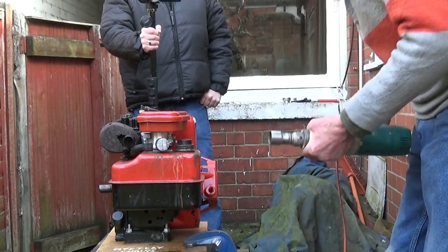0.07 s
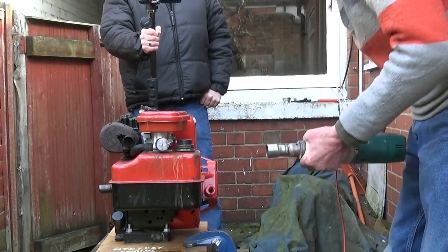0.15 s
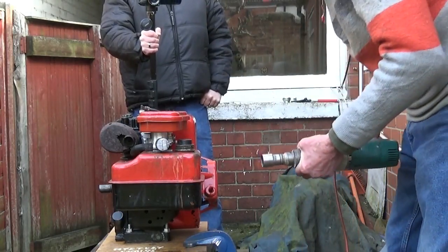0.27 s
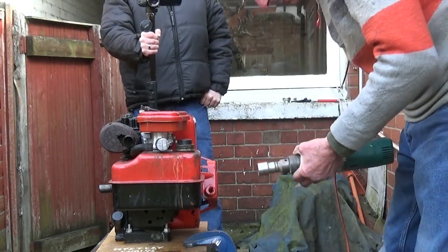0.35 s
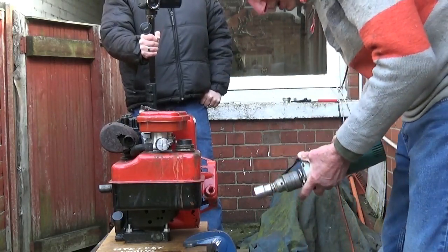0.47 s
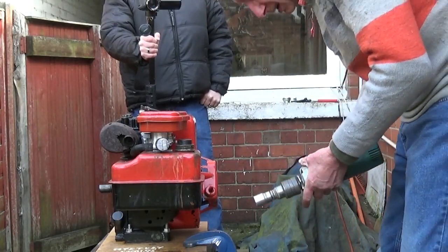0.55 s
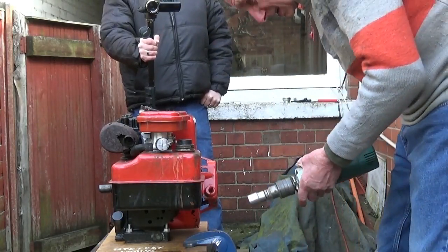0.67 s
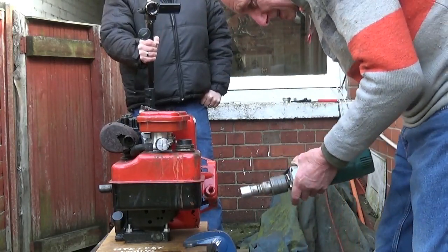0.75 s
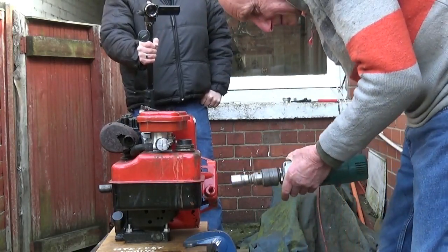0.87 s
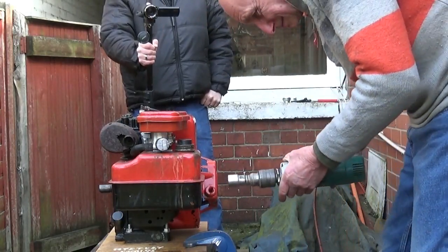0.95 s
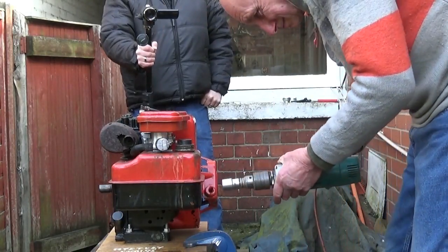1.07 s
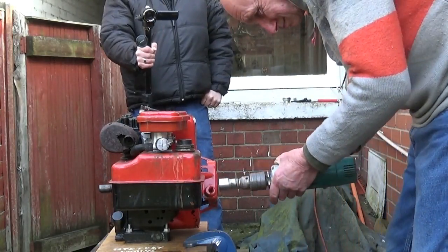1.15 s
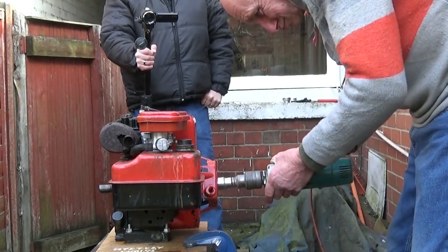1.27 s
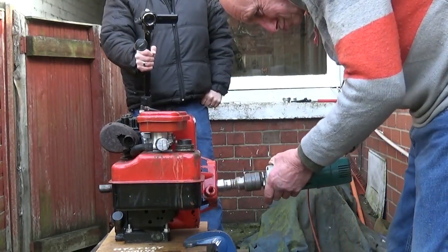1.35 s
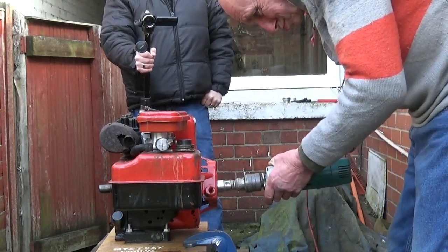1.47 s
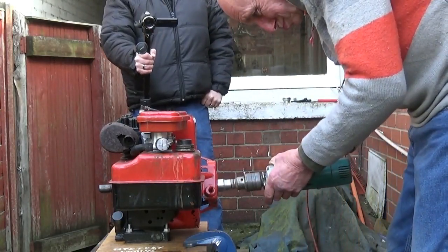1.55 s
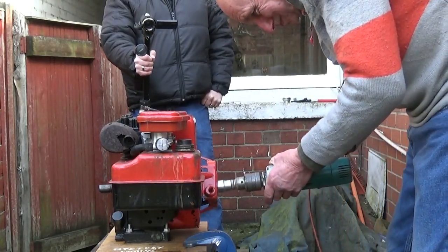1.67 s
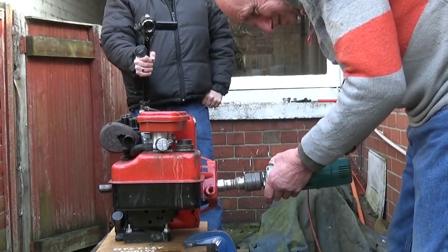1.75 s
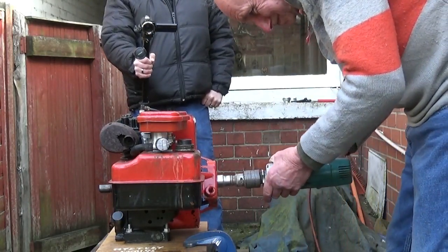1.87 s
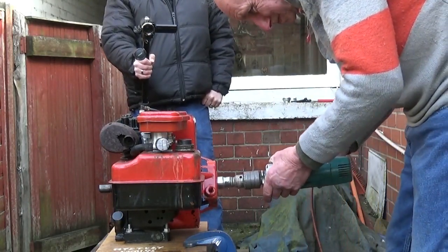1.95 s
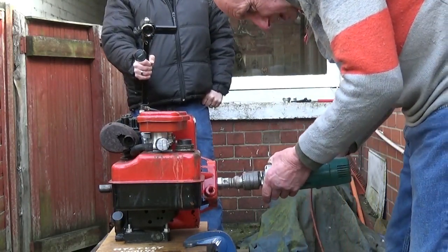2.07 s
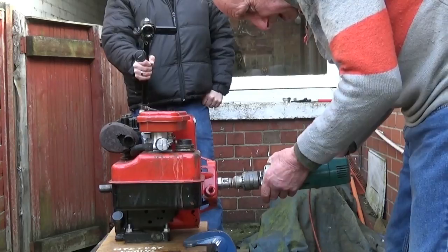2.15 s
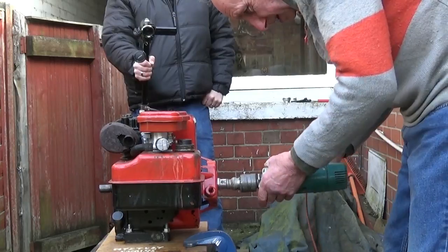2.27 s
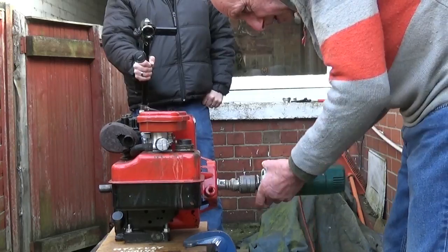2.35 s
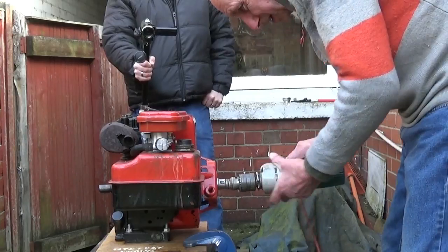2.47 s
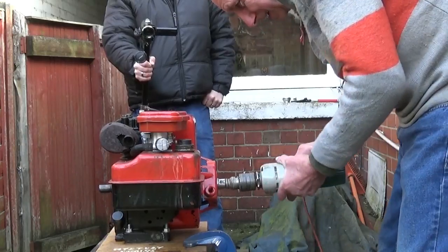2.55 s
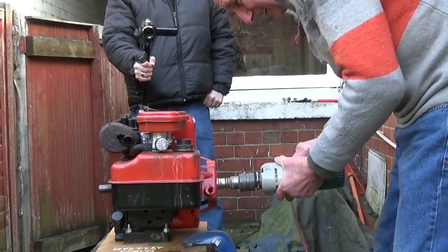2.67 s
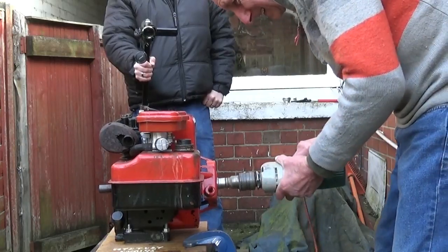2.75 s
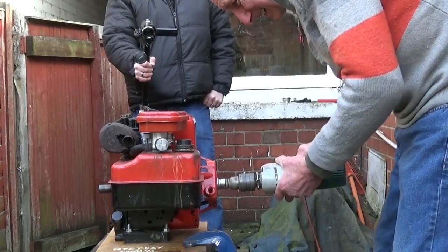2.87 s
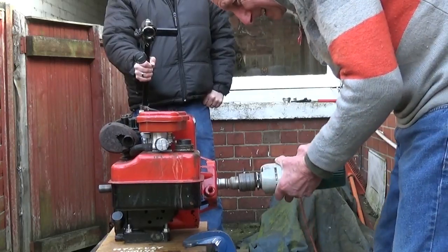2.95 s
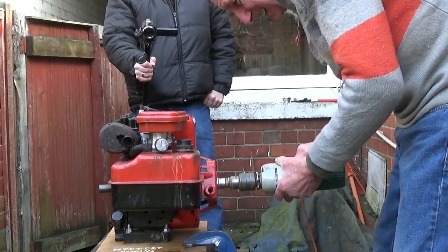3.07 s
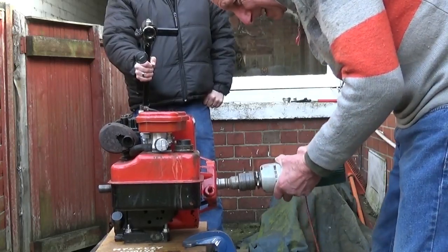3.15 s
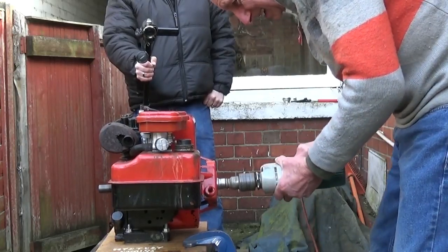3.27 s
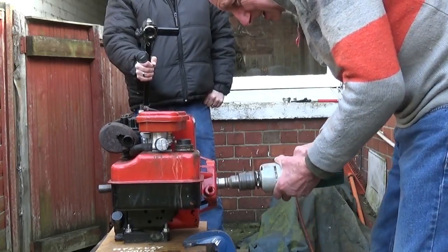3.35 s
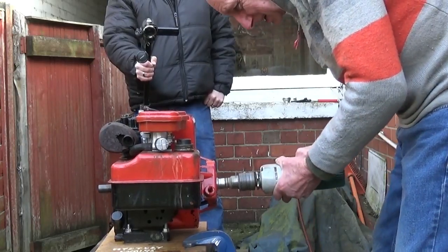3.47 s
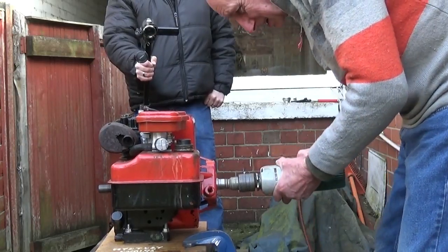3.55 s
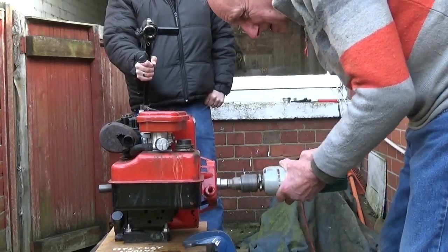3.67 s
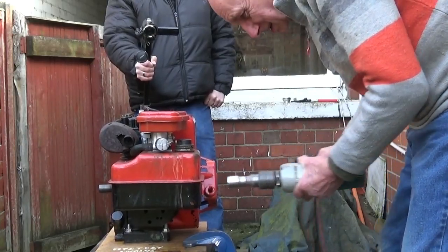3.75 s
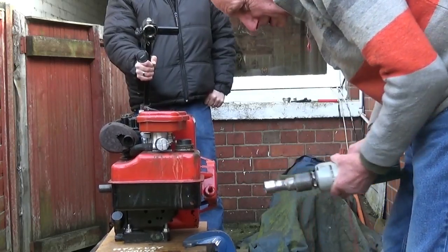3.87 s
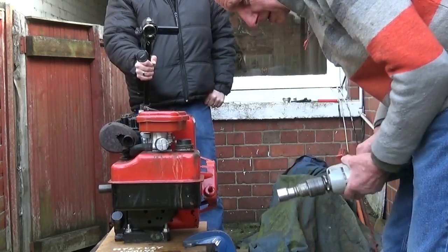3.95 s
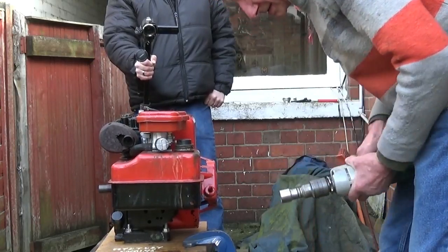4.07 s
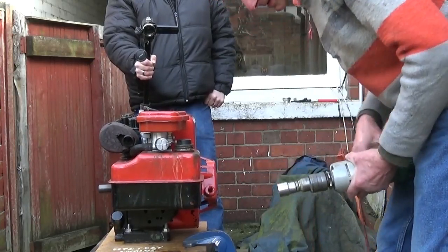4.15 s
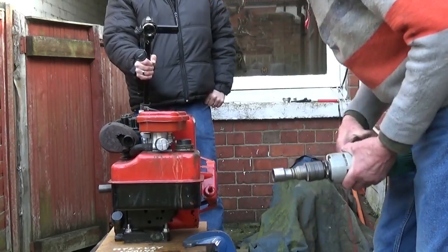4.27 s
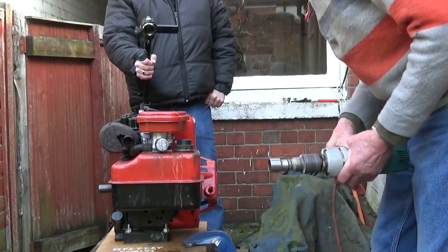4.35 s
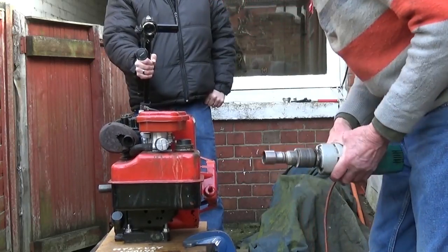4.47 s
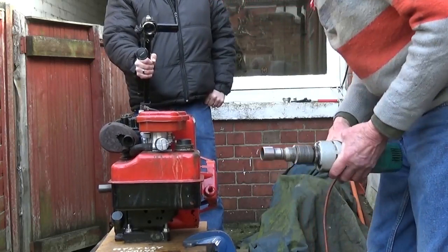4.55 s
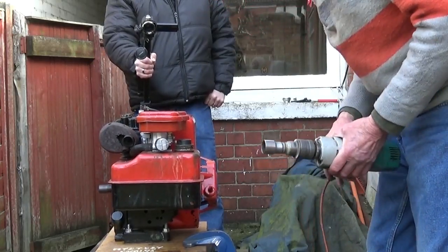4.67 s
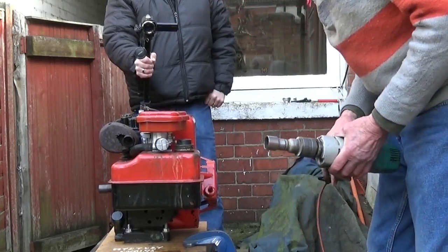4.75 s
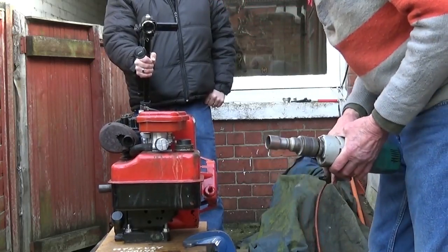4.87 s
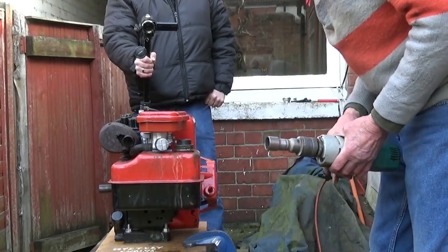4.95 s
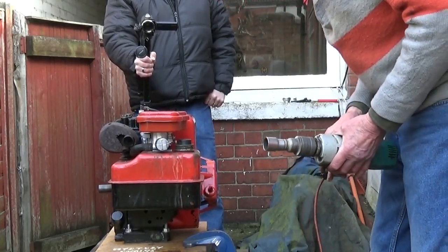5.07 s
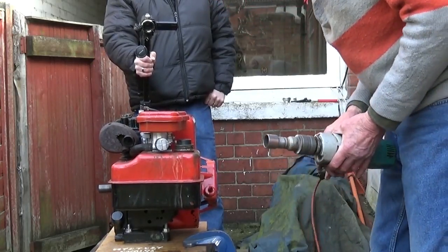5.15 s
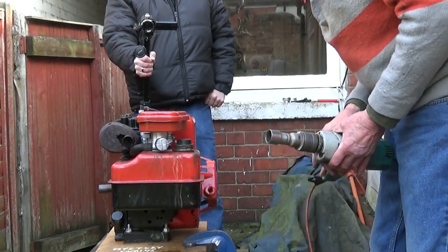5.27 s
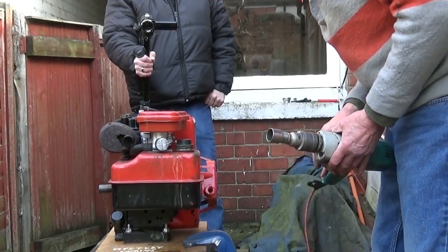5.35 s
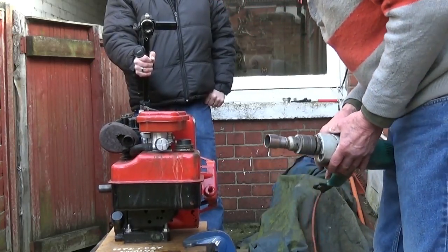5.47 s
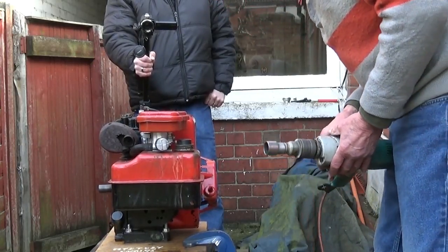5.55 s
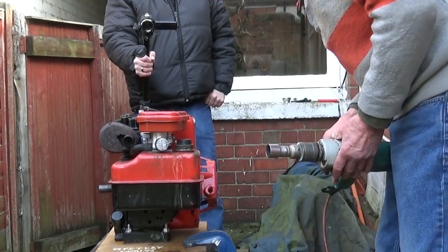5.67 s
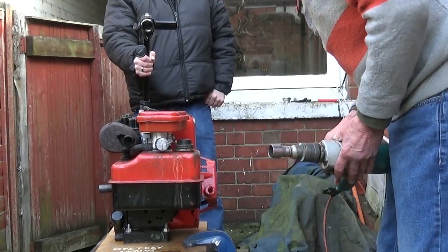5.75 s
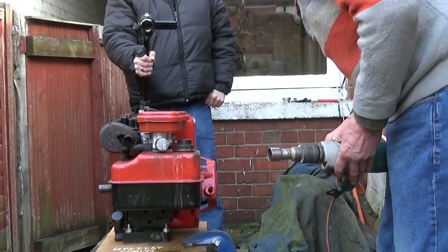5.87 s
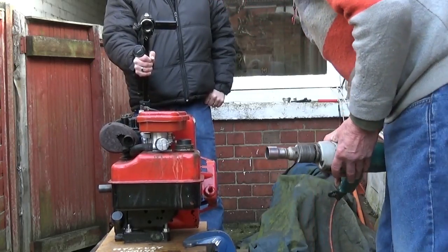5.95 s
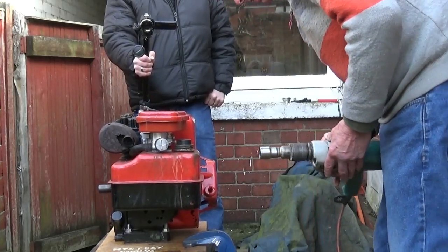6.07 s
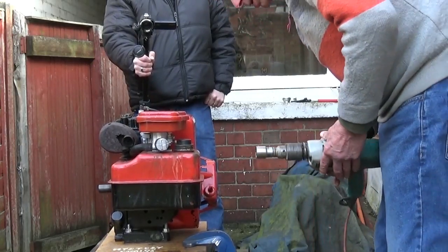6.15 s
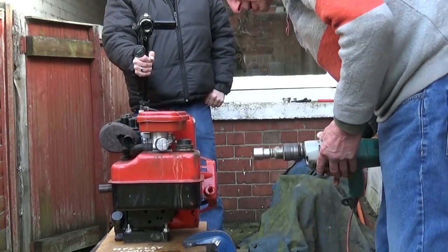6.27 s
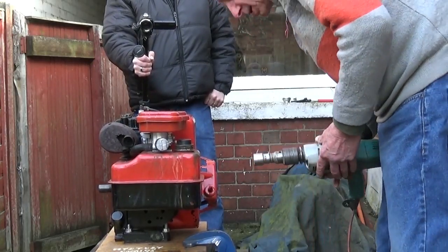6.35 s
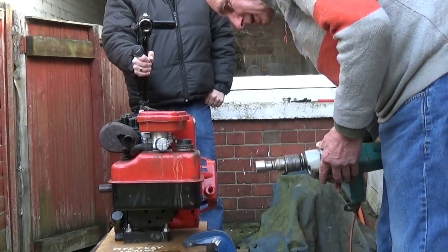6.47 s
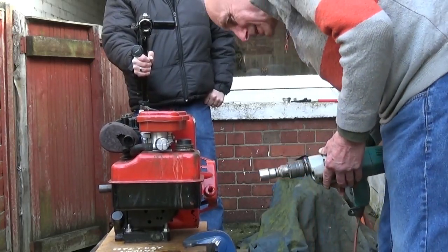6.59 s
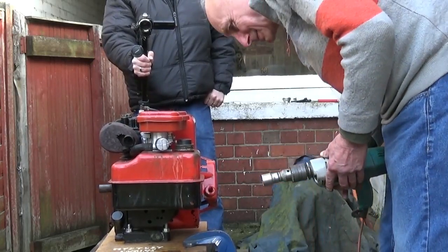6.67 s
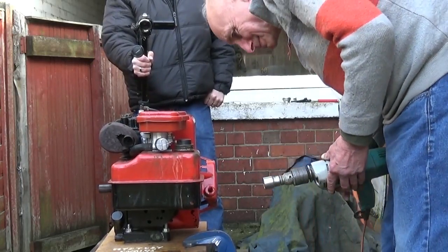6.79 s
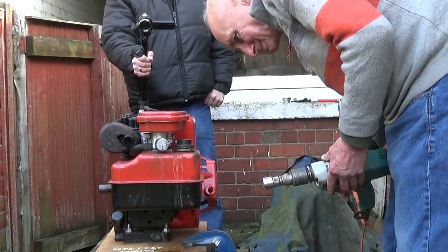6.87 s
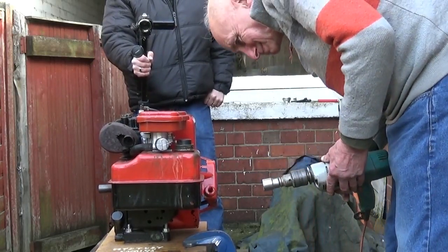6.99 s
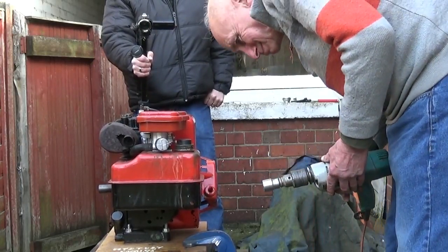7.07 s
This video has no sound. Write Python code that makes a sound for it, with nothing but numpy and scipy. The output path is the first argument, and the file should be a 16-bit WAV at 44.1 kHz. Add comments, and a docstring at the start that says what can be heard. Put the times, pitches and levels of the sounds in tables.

```python
"""Starting a small engine with an electric drill

A drill is blipped and coasts down while its socket is fumbled onto the shaft of a small single-cylinder engine.
The drill spins the engine up and is pulled off; the engine beats on, mostly slower and slower, and stops.
Each engine cycle has a valve clack, a knock and an exhaust puff. A brick yard answers.
Tones are sums of sines; rattles and hisses are dense random impacts given the colour of the part they strike.
"""
import sys
import numpy as np
from scipy import signal
from scipy.fft import rfft, irfft, next_fast_len
from scipy.io import wavfile
from scipy.ndimage import uniform_filter1d, map_coordinates

SR = 44100
rng = np.random.default_rng(int(sys.argv[2]) if len(sys.argv) > 2 else 0)


def int16_out(signal):
    """Quantize to a 16-bit WAV file."""
    q = np.round(np.clip(np.atleast_2d(signal).T, -1, 1) * 32767)
    wavfile.write(sys.argv[1], SR, q.astype(np.int16))


N = 313992  # length in samples

# colour of the drill's gear chatter: pitch_hz, relative level_db (per Hz)
GEAR_TONE = [(150, -51), (250, -17), (305, -22), (353, -31), (437, -16), (609, -35), (669, -12.5),
             (764, -13.5), (1020, -4), (1180, -4), (2400, 2), (3050, -3.5), (6000, -18), (7800, -33),
             (13200, -120)]
# colour of the drill's brush hiss: pitch_hz, relative level_db (per Hz)
BRUSH_TONE = [(1500, -19), (3500, -2), (5000, -1.5), (7000, 0), (9700, 0.5), (11000, -8.5), (13000, -17.5),
              (15800, -30)]
# resonances of the engine's metal: centre_hz, width_hz, boost_db over the rest
METAL_RESONANCES = [(429, 48, 6.5), (601, 77, 3.5), (828, 83, 2.5), (993, 45, 6), (1350, 127, 4),
                    (2050, 51, 1.5), (2528, 59, 4.5), (3970, 49, 3), (4620, 140, 4.5), (6040, 110, 4),
                    (9680, 730, 2.5)]
# colour of the crankcase: pitch_hz, relative level_db (per Hz)
CRANKCASE_COLOUR = [(330, -11.5), (560, -1.5), (900, 0), (1300, -4), (2500, -42)]
# resonances of the crankcase: centre_hz, width_hz, boost_db over the rest
CRANKCASE_RESONANCES = [(621, 48, 13.5), (820, 67, 11.5)]
# colour of the valve noises: pitch_hz, relative level_db (per Hz)
VALVE_COLOUR = [(120, -53), (200, -19), (596, -4), (728, -14), (1110, -1), (1280, -2.5), (1560, -7.5),
                (1780, 2), (2060, -7), (2560, -2), (5110, -5.5), (8660, -3), (15500, -22.5)]
# colour of the piston's knock: pitch_hz, relative level_db (per Hz)
KNOCK_COLOUR = [(120, -43), (200, -2.5), (479, -4), (1190, -4), (1880, 1.5), (2170, -2), (3070, 0.5),
                (3360, -5), (4410, -5), (7620, -7), (8980, -6.5), (14400, -27), (15500, -46)]
# how fast the engine turns: time_s, speed (four-stroke cycles a second)
ENGINE_CYCLES = [(2.65, 0.0), (2.8, 4.945), (3.15, 7.65), (3.55, 9.859), (4.2, 7.805), (5.1, 6.765),
                 (5.5, 6.026), (5.85, 6.307), (6.05, 5.631), (6.75, 4.828), (6.98, 2.236), (7.0, 0.0)]

TEETH = 6  # on the drill's pinion, so the gear mesh is six times the rotor speed
FIRST_STROKE_S, SOCKET_OFF_S = 2.85, 3.6  # compression builds; the drill lets go
SLOW_RATE = 5.92  # cycles a second of a slow beat
CLACK_PLACE, EXHAUST_PLACE = .394, .86  # where in the cycle these happen, 0-1


def amp(db):
    """Turn decibels into gain."""
    return 10 ** (np.asarray(db) / 20)


def unit(x):
    """Scale to an average (rms) strength of 1."""
    return x / np.sqrt(np.mean(x ** 2) + 1e-20)


def along(points, hz):
    """Read a curve of (Hz, value) points on a log pitch axis."""
    point_hz, values = np.transpose(points)
    return np.interp(np.log(hz + 1), np.log(point_hz + 1), values)


def curves(rows):
    """Turn each column after the time into one value per sample."""
    times, *columns = np.transpose(rows)
    return [np.interp(np.arange(N) / SR, times, column) for column in columns]


def wobble(rate):
    """Draw a smooth random curve through rate random points a second."""
    knots = rng.standard_normal(int(N * rate / SR) + 4)
    return map_coordinates(knots, [np.arange(N) * rate / SR])


def filtered(x, response):
    """Change the gain of every pitch in x by a response, a function of Hz."""
    length = x.shape[-1]
    padded = next_fast_len(length + 8192)
    spectrum = rfft(x, padded) * response(np.fft.rfftfreq(padded, 1 / SR))
    return irfft(spectrum, padded)[..., :length]


def shape(points, resonances, hz):
    """Gain of a broad spectrum with resonances on top."""
    peaks_db = sum(db / (1 + (2 * (hz - centre) / width) ** 2) for centre, width, db in resonances)
    return amp(along(points, hz) + peaks_db)


def causal(points, resonances, size=16384):
    """Impulse response of energy 1 with the given spectrum, sounding only after its start."""
    cepstrum = irfft(np.log(shape(points, resonances, np.fft.rfftfreq(size, 1 / SR))))
    # folding the second half onto the first gives minimum phase
    cepstrum[1:size // 2] *= 2
    cepstrum[size // 2 + 1:] = 0
    response = irfft(np.exp(rfft(cepstrum)))
    return response / np.linalg.norm(response)


def rattle(tone, rate, resonances=(), patchy_db=0):
    """Dense tiny impacts, rate a second, in a body whose modes they strike with ever new strengths; rms 1."""
    impacts = rng.standard_normal(N) * (rng.random(N) < rate / SR)
    z = signal.stft(impacts, nperseg=512)[2]
    # smooth over neighbouring pitches, then over time
    patches = uniform_filter1d(rng.standard_normal(z.shape), size=3, axis=0)
    patches = uniform_filter1d(patches, size=6, axis=1)
    impacts = signal.istft(z * amp(patchy_db * unit(patches)), nperseg=512)[1][:N]
    return unit(filtered(impacts, lambda hz: shape(tone, resonances, hz)))


def bursts(times, levels, attack, hold, t60):
    """Envelope of blows that rise, chatter on for a while and die 60 dB in t60; all in seconds."""
    t, out = np.arange(SR // 2) / SR, np.zeros(N + SR)
    blow = (1 - np.exp(-t / attack)) * amp(-60 * np.maximum(t - hold, 0) / t60)
    for s, db in zip(times, levels):
        out[round(s * SR):][:len(t)] += amp(db) * blow
    return out[:N]


def ring(times, levels, modes, scatter_db):
    """Every blow rings the modes, fading sines, at slightly new strengths."""
    t, out = np.arange(SR // 3) / SR, np.zeros(N + SR)
    hz, mode_db, t60 = np.transpose(modes)[:, :, None]
    onset = 1 - np.exp(-t / 0.00068)
    for s, db in zip(times, levels):
        strength, phase = rng.standard_normal((2, len(modes), 1))
        level_db = db + mode_db + scatter_db * strength - 60 * t / t60
        partials = amp(level_db) * np.sin(2 * np.pi * (hz * t + phase))
        out[round(s * SR):][:len(t)] += partials.sum(0) * onset
    return out[:N]


def running(start, stop, rise, fall):
    """1 between start and stop, after a straight rise and before a slow fade; all in seconds."""
    t = np.arange(N) / SR
    return np.clip((t - start) / rise, 0, 1) * np.exp(-np.maximum(t - stop, 0) / fall)


def drill():
    """One free blip, then the real attempt."""
    return blip() + cranking()


def blip():
    """The trigger snaps and the drill runs free for a moment; whine, gears and brushes all fade as it slows."""
    # gear mesh while the trigger is held: time_s, pitch_hz
    driven = [(.05, 500), (.1, 1766), (.14, 2560), (.18, 2890)]
    speed, rotor_hz, turn = rotor(driven, sag_hz=600.3)
    trigger = running(0.048, 0.34, rise=0.036, fall=0.25)
    effort = running(0.038, 2.07, rise=0.022, fall=0.12) * np.maximum(speed, trigger)
    gears = amp(-20.5) * effort ** 0.78
    brushes = amp(-18.0) * effort ** 1.38
    noise = drill_noise(gears, brushes, turn, throb=0.084)
    tones = whine(turn, amp(-22.0) * effort * speed ** 1.3, amp(-28.5) * effort, backlash=.45)
    snap = bursts([.046], [-30], attack=.0005, hold=.004, t60=.05) * rattle(GEAR_TONE, 6000)
    buzz = amp(-8.5) * brushes * commutator(turn, rotor_hz)
    return noise + tones + snap + buzz


def cranking():
    """The drill strains as it breaks the engine loose; loaded teeth mesh roughly, freed ones sing an octave up."""
    # gear mesh while the drill turns the engine: time_s, pitch_hz
    driven = [(2.64, 120), (2.73, 810), (2.77, 1110), (2.85, 1372), (2.95, 1663), (3.03, 1720),
              (3.12, 1850), (3.2, 2033), (3.3, 2347), (3.4, 2135), (3.45, 2284), (3.56, 2390), (3.74, 2570)]
    speed, _, turn = rotor(driven, sag_hz=30.2)
    load = running(2.638, 3.3, rise=0.056, fall=0.6)
    strain = running(2.638, 2.72, rise=0.035, fall=0.086)
    gears = amp(-22) * load + amp(-25.5) * strain
    noise = drill_noise(gears, amp(-17.0) * load, turn, throb=0.15)
    tooth_gain = amp(-21.0) * speed ** .7 * running(2.66, 3.26, rise=0.051, fall=0.12)
    freed_gain = amp(-17.0) * speed ** 4 * running(2.6, 4.36, rise=0.75, fall=0.068)
    early_gain = amp(-21.5) * running(2.7, 2.794, rise=.07, fall=.1)
    return noise + whine(turn, tooth_gain, freed_gain + early_gain, backlash=.35 + .55 * load)


def rotor(driven, sag_hz):
    """The rotor follows the trigger, then sags and coasts down: speed (1 is full), turns a second, angle."""
    full_hz, friction_hz_per_s = 3100, 1068  # mesh at full speed; steady loss when coasting
    sag_s = .1  # time of the first quick sag
    coasting = np.maximum(np.arange(N) / SR - driven[-1][0], 0)
    sag = sag_hz * (1 - np.exp(-coasting / sag_s))
    mesh_hz = np.maximum(curves(driven)[0] - friction_hz_per_s * coasting - sag, 0)
    rotor_hz = mesh_hz / TEETH * (1 + 0.00243 * wobble(70) + 0.00408 * wobble(500))
    return mesh_hz / full_hz, rotor_hz, 2 * np.pi * np.cumsum(rotor_hz) / SR


def whine(turn, tooth_gain, overtone_gain, backlash):
    """Teeth whine with sidebands from uneven turning; the gearbox rings as a tone glides through a resonance."""
    # tones around the tooth rate, the sixth: multiple of the rotor speed, relative level_db
    orders = [(4, -14.5), (5, -9), (6, 1), (7, -5.5), (8, -16)]
    # how well the drill's gearbox radiates: pitch_hz, relative level_db
    housing = [(2000, 0.5), (2900, 2.5), (3600, 5), (5100, 0.5), (6600, -6)]
    resonances = [(2340, 200, 4.7), (4160, 300, 2.8)]  # centre_hz, width_hz, boost_db
    teeth = 0
    for order, db in orders:
        teeth = teeth + amp(db + 1.5 * wobble(70)) * np.sin(round(order) * turn + backlash * wobble(420))
    overtones = 0
    for k, db in enumerate([0, -7, -17], 2):
        angle = k * TEETH * turn + 0.29 * (k - 1) * wobble(200)
        overtones = overtones + amp(db + 3.24 * wobble(70)) * np.sin(angle)
    tones = tooth_gain * teeth + overtone_gain * overtones
    return filtered(tones, lambda hz: shape(housing, resonances, hz))


def drill_noise(gears, brushes, turn, throb):
    """Gear chatter and brush hiss at the given gains, both pulsing with the rotor."""
    gear_modes = [(1057, 62, 6.2), (2550, 190, 4.0), (3360, 190, 2.6)]  # centre_hz, width_hz, boost_db
    brush_modes = [(5400, 160, 1.3), (10000, 360, 2.8)]
    chatter = gears * amp(2.15 * wobble(90)) * rattle(GEAR_TONE, 6000, gear_modes, patchy_db=2.5)
    hiss = brushes * amp(0.9 * wobble(120)) * rattle(BRUSH_TONE, 14000, brush_modes, patchy_db=3.0)
    return (chatter + hiss) * (1 + throb * np.sin(turn))


def commutator(turn, rotor_hz, count=72):
    """The brushes meet the same uneven segments on every turn: a comb of fine gliding lines."""
    strength, phase = rng.standard_normal((2, count, 1))
    angle = np.linspace(0, 2 * np.pi, 4096)
    orders = np.arange(1, count + 1)[:, None]
    profile = (strength * (orders > 8) * np.sin(orders * angle + 2 * np.pi * phase)).sum(0)
    buzz = np.interp(turn % (2 * np.pi), angle, profile)
    buzz = buzz * (rotor_hz < 400)  # at full speed the lines blur into the hiss
    return unit(filtered(buzz, lambda hz: amp(along(BRUSH_TONE, hz))))


def strokes(place, slow_db, faster_db, driven_db):
    """Times, levels and engine speeds at which the cycle passes a place; speed and the drill shift the level."""
    rate = curves(ENGINE_CYCLES)[0]
    cycles = np.cumsum(rate) / SR
    at = np.searchsorted(cycles, np.arange(place, cycles[-1], 1))
    at = at[at > FIRST_STROKE_S * SR]
    times, rates = at / SR, rate[at]
    speed_db = faster_db * np.maximum(rates - SLOW_RATE, 0)
    return times, slow_db + speed_db + driven_db * (times < SOCKET_OFF_S), rates


def clatter():
    """Each cycle: a valve clacks, the piston knocks, the exhaust valve lifts and rattles."""
    clacks, clack_rings = valve_clack()
    knocks, knock_rings = piston_knock()
    blows = clacks + knocks + exhaust_valve() + rebound()
    return clack_rings + knock_rings + blows * amp(.4 * wobble(200))


def valve_clack():
    """A valve clacks once a cycle: a burst of rattling metal, and separately the ringing valve gear."""
    # clack strength: relative slow_db, db per cycle a second faster, db added while the drill drives
    strength = (-10, -1, -7)
    # ringing valve gear: pitch_hz, relative level_db, t60_s
    modes = [(583, -9.5, 0.093), (990, -5.5, 0.05), (1266, 1.5, 0.059), (2480, -12, .08), (5850, -20, 0.11),
             (9000, -2, 0.12), (9180, -1, .1)]
    times, db, _ = strokes(CLACK_PLACE, *strength)
    envelope = bursts(times - .001, db - 4.0, attack=0.0013, hold=0.023, t60=.13)
    clacks = envelope * rattle(VALVE_COLOUR, 20000, METAL_RESONANCES, patchy_db=3.0)
    return clacks, ring(times, db - 7.5, modes, scatter_db=3.5)


def piston_knock():
    """The piston knocks once a cycle: a burst of rattling metal, and separately the ringing cylinder."""
    # knock strength: relative slow_db, db per cycle a second faster, db added while the drill drives
    strength = (-9, -1.1, -10.5)
    # ringing cylinder: pitch_hz, relative level_db, t60_s
    modes = [(430, -19, 0.069), (1406, -7, 0.06), (1766, -3.5, 0.038), (1890, 4, 0.042), (2600, -9, 0.13),
             (2714, -7, 0.14), (4500, -4, 0.091)]
    times, db, _ = strokes(.697, *strength)  # place in the cycle, 0-1
    envelope = bursts(times - .001, db - 5.0, attack=0.0022, hold=0.011, t60=0.26)
    knocks = envelope * rattle(KNOCK_COLOUR, 10000, METAL_RESONANCES, patchy_db=4.5)
    return knocks, ring(times, db - 4.5, modes, scatter_db=3.5)


def exhaust_valve():
    """The exhaust valve lifts with a bright tick and then rattles."""
    # rattle strength: slow_db, db per cycle a second faster, db added while the drill drives
    rattle_strength = (-14, -1.4, -8.5)
    # tick strength: the same columns
    tick_strength = (-23.5, 1.3, 0)
    times, db, _ = strokes(EXHAUST_PLACE, *rattle_strength)
    envelope = bursts(times + 0.0048, db, attack=0.0039, hold=0.024, t60=0.23)
    valve = envelope * rattle(VALVE_COLOUR, 20000, METAL_RESONANCES, patchy_db=3.0)
    times, db, _ = strokes(EXHAUST_PLACE, *tick_strength)
    sizzle = rattle([(5000, -23), (9500, 1), (11500, 1), (15500, -18)], 8300, patchy_db=3)
    tick = bursts(times - .002, db, attack=.002, hold=0.011, t60=0.065) * sizzle
    return valve + tick


def rebound():
    """At the end the piston fails to pass the top and rocks back: one last knock."""
    envelope = bursts([6.988], [-18], attack=0.0041, hold=0.015, t60=0.077)
    return envelope * rattle(KNOCK_COLOUR, 6000, METAL_RESONANCES)


def exhaust(bounce=.021, turbulence=0.03):
    """Each stroke lets out a few quick surges of gas, bounce seconds apart, that boom in the silencer."""
    # puff strength: relative slow_db, db per cycle a second faster, db added while the drill drives
    strength = (-20, 1, -2.7)
    # colour of the puff: pitch_hz, relative level_db (per Hz)
    puff_colour = [(20, -22), (45, -15), (65, -4), (100, -6.5), (140, -4), (190, -3), (245, -4.5),
                   (320, -5), (420, -5.5), (700, -5.5), (1500, -68)]
    # silencer resonances: centre_hz, width_hz, boost_db over the rest
    silencer = [(60.3, 25, 7.5), (108.3, 27, 6), (184.7, 54, 9), (246, 17, 8), (421.6, 10, 9.5)]
    times, db, rates = strokes(EXHAUST_PLACE, *strength)
    db = db + np.interp(rates, [4.8, 5.4], [-7, 0])  # near the stall the charge leaks away
    surges = np.zeros(N + SR)
    for s, level, rate in zip(times, db, rates):
        vigour = np.interp(rate, [5.3, 7], [.45, 1])  # a slow stroke hardly surges again
        for k, size in enumerate([1, .9, .45]):
            start_s = s + .003 + k * bounce + rng.normal(0, .0006)
            gain = amp(level + 20.5 + rng.normal(0, 0.78))
            surges[round(start_s * SR)] -= gain * size * vigour ** k
    envelope = bursts(times, db + 20.5, attack=0.002, hold=0.036, t60=0.24)
    gas = envelope * turbulence * rng.standard_normal(N)
    return signal.fftconvolve(surges[:N] + gas, causal(puff_colour, silencer))[:N]


def churn():
    """Running gear rubs and whirls, louder with speed, easing briefly once a cycle; the crankcase drones along."""
    # colour of crankcase and tank: pitch_hz, relative level_db (per Hz)
    case_colour = [(150, -54), (250, -7), (372, -10), (603, 2.5), (717, -6), (795, 5.5), (882, -5),
                   (1270, -2.5), (1590, -1.5), (1890, 1), (2090, -2), (2570, -2), (7510, -7.5),
                   (9070, -4.5), (15500, -23)]
    rate = curves(ENGINE_CYCLES)[0]
    rub = running(2.65, 6.94, rise=.05, fall=.035) * amp(-26)
    whirl = running(3.02, 9.1, rise=0.65, fall=.035) * amp(-31.5) * (rate / SLOW_RATE) ** 3.26
    before_clack = np.cos(np.pi * (np.cumsum(rate) / SR - CLACK_PLACE + 0.068)) ** 2
    eased_db = -3.5 * before_clack ** 3
    body = rattle(case_colour, 7000, METAL_RESONANCES, patchy_db=2)
    drone = amp(-14) * rattle(CRANKCASE_COLOUR, 5000, CRANKCASE_RESONANCES)
    return (rub + whirl) * amp(eased_db + 1.6 * wobble(70)) * (body + drone)


def socket():
    """The loose socket chatters on the shaft, which rings and passes the blows into the crankcase."""
    # socket against the shaft end: time_s, then relative levels blow_db, scrape_db (bright), crankcase_db
    blows = [(1.403, -17, -19, -30.5), (1.513, -10, -35, -31), (1.7978, -5, -24, -25),
             (2.0574, -24, -47, -39), (2.175, -22.5, -35, -32), (2.19, -28, -40, -26),
             (2.3295, -33, -49, -52), (2.3847, -7.5, -15.5, -17), (2.4464, -31, -37, -23),
             (2.555, -29.5, -36, -46)]
    # ringing shaft: pitch_hz, relative level_db, t60_s
    shaft = [(620, -9, 0.16), (1226, -5, 0.16), (1343, -6, 0.17), (1420, -2, 0.13), (1650, -6, 0.073),
             (2036, -13, 0.19), (2130, -10, 0.14), (2595, -30, 0.15), (3350, -14, 0.13)]
    # dull bumps of handling: time_s, level_db
    bumps = [(.74, -35.5), (.795, -47), (2.13, -40), (2.2, -39), (2.392, -29), (2.47, -38), (2.575, -37)]
    # colours of clunk and thud: pitch_hz, relative level_db (per Hz)
    clunk_colour = [(300, -17), (700, -16.0), (1500, 1), (3300, -3.0), (6000, -30)]
    thud_colour = [(80, -26), (160, 0.5), (340, 3.0), (600, -6), (1500, -33)]
    times, blow_db, scrape_db, case_db = np.transpose(blows)
    metal = ring(times, blow_db - 9, shaft, scatter_db=-0.5)
    clunk = bursts(times, blow_db - 11.5, attack=0.0006, hold=0.0025, t60=0.21)
    clunk = clunk * rattle(clunk_colour, 5000, METAL_RESONANCES)
    passed_db = np.minimum(case_db, blow_db - 4)  # the crankcase stays below the blow itself
    case = bursts(times, passed_db + 0.5, attack=0.0029, hold=0.0057, t60=0.26)
    case = case * rattle(CRANKCASE_COLOUR, 5000, CRANKCASE_RESONANCES)
    scrape = bursts(times, scrape_db - 0.5, attack=0.00032, hold=0.0047, t60=0.14)
    scrape = scrape * rattle(BRUSH_TONE, 4000, patchy_db=-2.5)
    thuds = bursts(*np.transpose(bumps), attack=0.0035, hold=0.026, t60=0.32) * rattle(thud_colour, 5000)
    # straining against the first compression
    groan = bursts([2.66], [-25], attack=0.0022, hold=0.193, t60=0.14)
    groan = groan * rattle(CRANKCASE_COLOUR, 5000, CRANKCASE_RESONANCES)
    return metal + clunk + case + scrape + thuds + groan


def yard(x):
    """Wall and fence answer with a short tail of fading noise, different in each ear."""
    # how long the yard rings: pitch_hz, t60_s
    decay = [(100, 0.09), (600, 0.32), (2500, 0.26), (8000, 0.24), (15000, 0.15)]
    # colour of the answer: pitch_hz, relative level_db
    colour = [(40, -14), (150, -7), (500, 1), (4000, 0), (8500, 0), (12000, -16)]
    hz, t, z = signal.stft(rng.standard_normal((2, SR // 2)), SR, nperseg=256)
    tail = signal.istft(z * amp(-60 * t / along(decay, hz)[:, None]), SR, nperseg=256)[1]
    tail = tail / np.linalg.norm(tail[0])
    delayed = np.pad(x, (round(.003 * SR), 0))  # 3 ms
    wet = signal.fftconvolve(delayed[None], tail, axes=1)[:, :N]
    return filtered(wet, lambda f: amp(along(colour, f)))


def air():
    """Low outdoor rumble with a faint drone, nearly alike in both ears."""
    # colour of the background: pitch_hz, relative level_db (per Hz)
    colour = [(20, -19), (55, -3), (100, -7.5), (135, -11), (350, -10.5), (900, -11.5), (2500, -18.5),
              (8000, -22), (15800, -40)]
    # level of the background before its small wobble: time_s, level_db
    levels = [(0, -46.5), (.06, -27.5), (.13, -36.5), (.5, -38.5), (1.5, -40), (2, -38.5), (2.3, -44),
              (7.1, -45)]
    drone = [(102, 7.2, 11.0)]  # centre_hz, width_hz, boost_db
    both, left, right = (rattle(colour, SR, drone) for _ in range(3))
    return amp(curves(levels)[0] + 0.86 * wobble(14.0)) * (both + 0.1 * np.array([left, right]))


def scene():
    """The engine stands near the middle of the yard, the drill a little further to the right."""
    tool = drill()
    engine = socket() + churn() + clatter() + exhaust()
    # left and right gains in dB
    direct = tool * amp([[-.7], [.7]]) + engine * amp([[-.25], [.25]])
    return amp(-1.91) * (direct + amp(-9.0) * yard(tool + engine)) + air()


def record(dry):
    """Round off the highest peaks smoothly and keep nothing above the top pitch."""
    top_hz = 15600
    rounded = dry / (1 + np.abs(dry / .75) ** 4) ** (1 / 4)
    return filtered(rounded, lambda hz: hz < top_hz)


dry = scene()
out = record(dry)
int16_out(out)
```